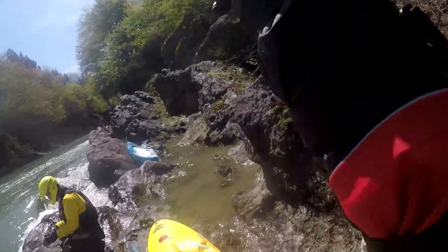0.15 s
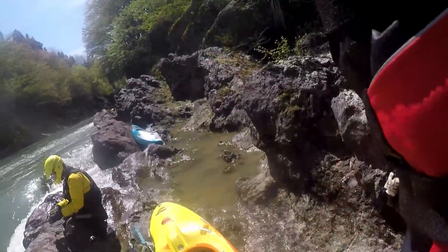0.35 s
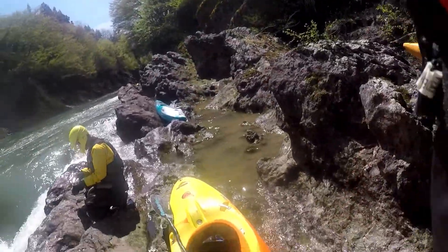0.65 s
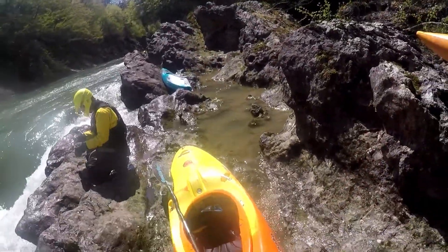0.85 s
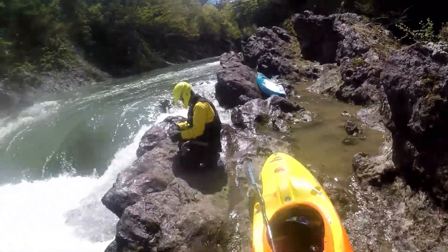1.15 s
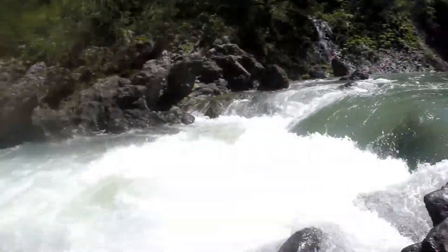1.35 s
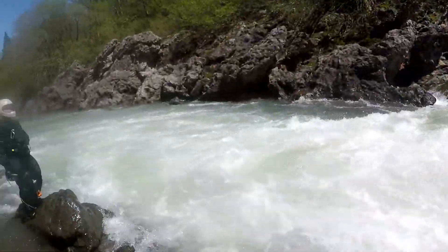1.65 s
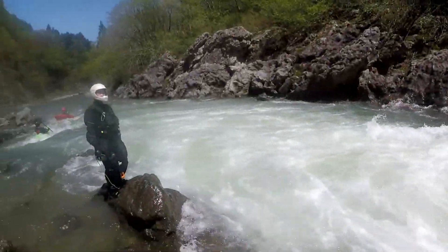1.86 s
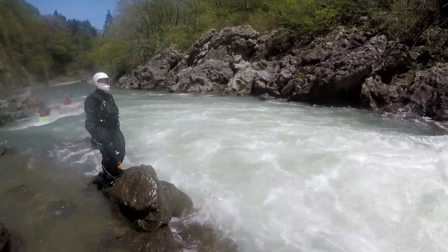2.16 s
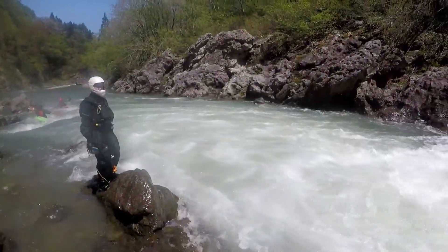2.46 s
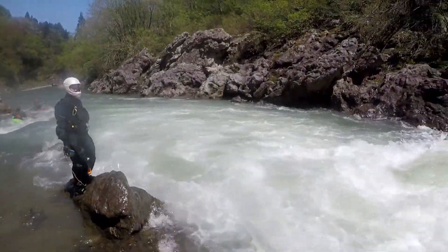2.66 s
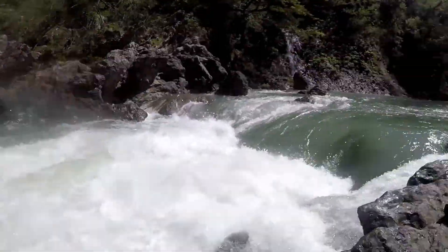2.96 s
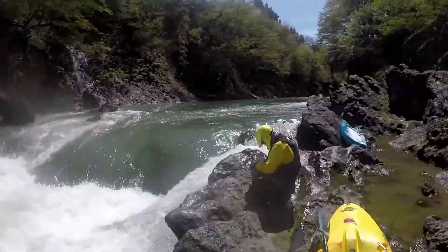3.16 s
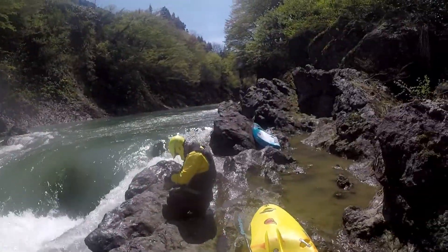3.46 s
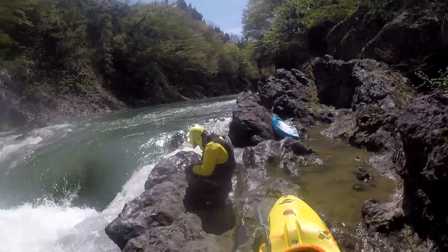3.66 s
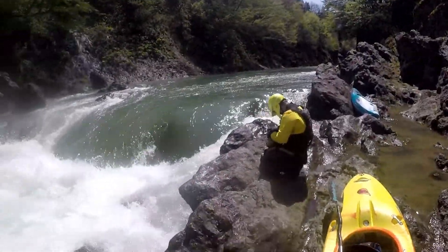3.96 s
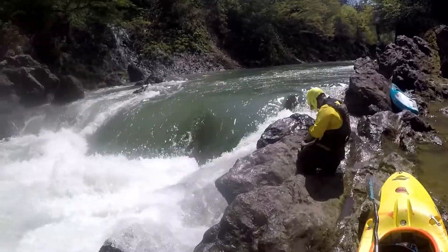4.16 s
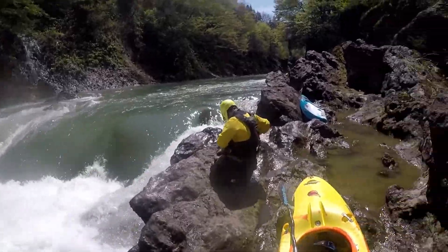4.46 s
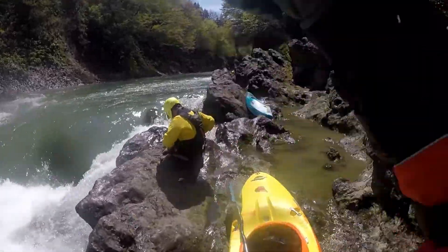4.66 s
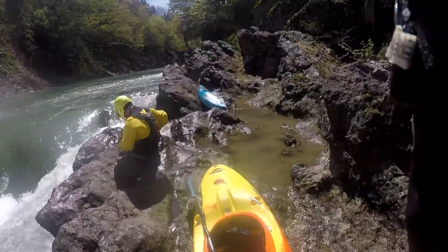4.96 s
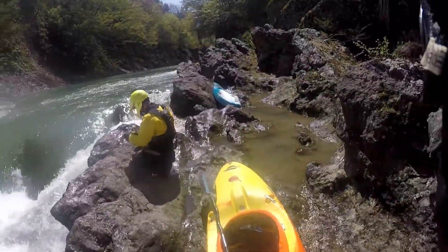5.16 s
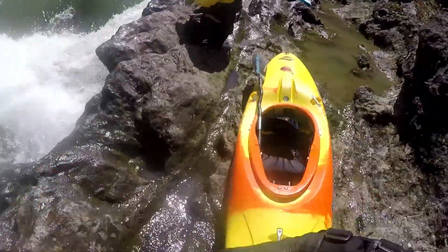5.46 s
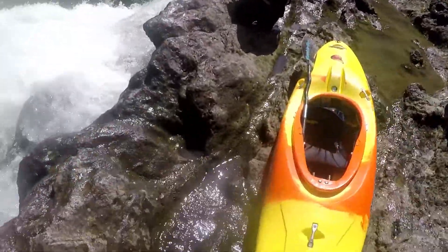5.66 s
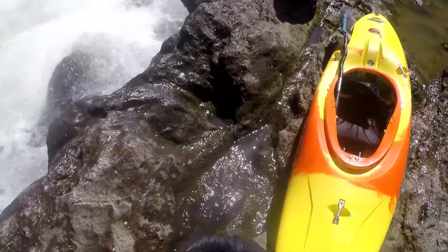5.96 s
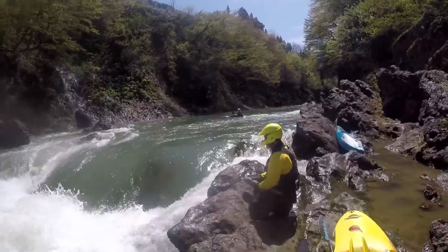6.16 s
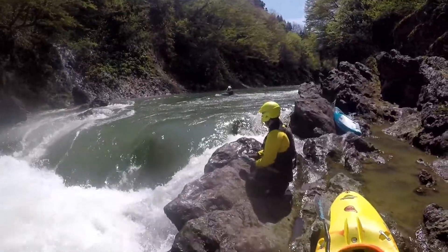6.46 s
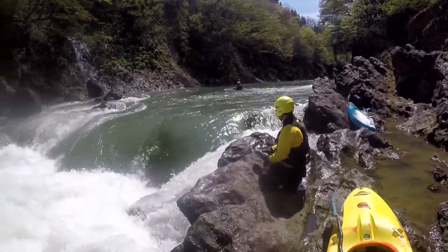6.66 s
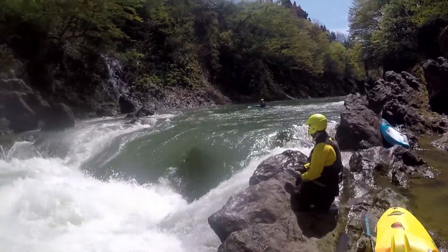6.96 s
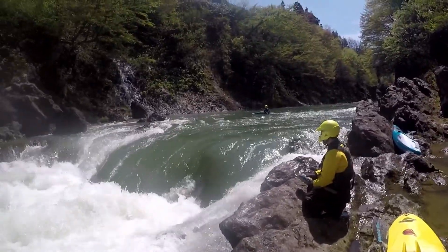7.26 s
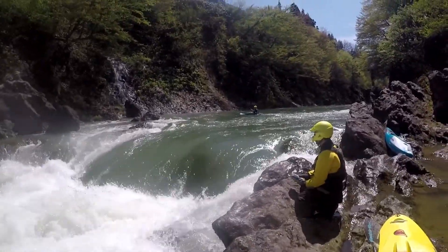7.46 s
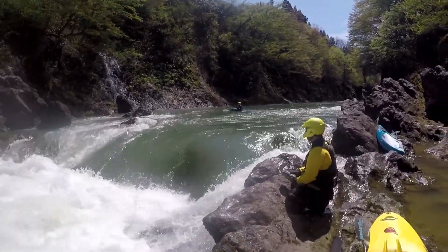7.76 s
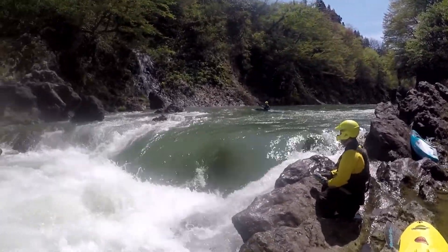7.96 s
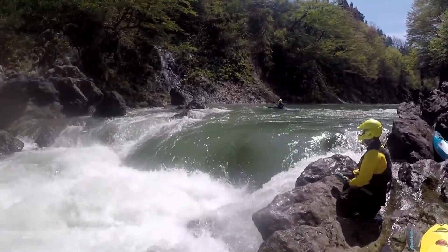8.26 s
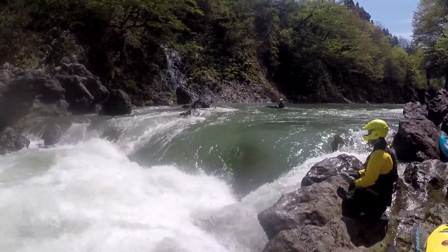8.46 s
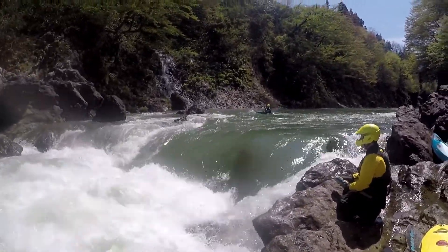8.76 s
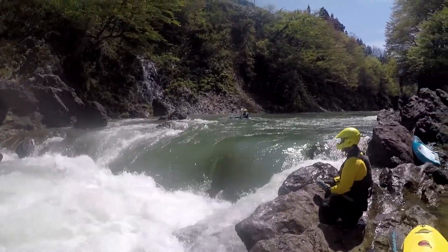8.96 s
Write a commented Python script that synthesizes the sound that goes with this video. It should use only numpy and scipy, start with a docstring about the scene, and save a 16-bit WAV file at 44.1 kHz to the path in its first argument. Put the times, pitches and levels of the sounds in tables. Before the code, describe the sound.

Gusty low rumble and dull jolts hit a body-worn microphone beside rushing rapids. The foaming water hisses and booms throughout, turning brighter or duller as the wearer swings between bank, pool and ledge. About five seconds in comes one sharp plastic knock with brief muffled scuffs of gear. For the last third the wind fades and the water rushes on evenly.

```python
"""A whitewater river rushes over a rock ledge into a foaming hole: foam hisses, bubbles ring, trapped air booms.
It is heard from a body-worn camera in a housing. The wearer turns from the bank to the pool, back to the
ledge and down to the rocks, and the rush changes colour with each turn. Until the wearer stands still,
moving air and jostling rumble on the microphone, and the plastic housing is knocked once."""
import sys
import numpy as np
from scipy import signal
from scipy.fft import rfft, irfft, next_fast_len
from scipy.io import wavfile
from scipy.ndimage import uniform_filter1d, map_coordinates

SR = 44100
rng = np.random.default_rng(int(sys.argv[2]) if len(sys.argv) > 2 else 0)


def file_out(sig):
    """Save sig as 16-bit WAV at sys.argv[1]."""
    # one column per channel
    cols = np.atleast_2d(sig).T
    # limit, then scale
    lim = np.clip(cols, -1, 1)
    pcm = np.round(lim * 32767).astype(np.int16)
    wavfile.write(sys.argv[1], SR, pcm)


N = 401751
TIME = np.arange(N) / SR


def amp(db):
    """Amplitude ratio of a level in decibels."""
    return 10 ** (np.asarray(db) / 20)


def unit(x):
    """Normalisation to rms 1."""
    return x / np.sqrt(np.mean(x ** 2) + 1e-20)


def wobble(per_s):
    """Random modulation: a spline through per_s Gaussian values a second."""
    knots = rng.standard_normal(int(N * per_s / SR) + 4)
    return map_coordinates(knots, [TIME * per_s])


def swells(rows):
    """Superposed Gaussian envelopes, each with a peak time, a length and a level in dB."""
    return sum(amp(db) * np.exp(-(2 * (TIME - s) / length) ** 2) for s, length, db in rows)


def filtered(x, response):
    """Linear filtering: the spectrum of x is multiplied by a frequency response."""
    size = next_fast_len(N + SR // 2)
    return irfft(rfft(x, size) * response(np.fft.rfftfreq(size, 1 / SR)), size)[:N]


def coloured(x, spectrum, modes=()):
    """Source and filter: a spectral envelope with resonances and notches shapes x, returned at rms 1."""
    points_hz, points_db = np.transpose(spectrum)

    def response(hz):
        envelope_db = np.interp(np.log(hz + 1), np.log(points_hz + 1), points_db)
        rolloff_db = 40 * np.log10(np.maximum(hz / points_hz[-1], 1))
        modes_db = sum(db / (1 + (2 * (hz - centre) / width) ** 2) for centre, width, db in modes)
        return amp(envelope_db - rolloff_db + modes_db)
    return unit(filtered(x, response))


def churn(patchy_db):
    """Amplitude modulation band by band: noise swells and fades in patches as foam heaves."""
    bands = signal.stft(rng.standard_normal(N), nperseg=512)[2]
    patches = uniform_filter1d(rng.standard_normal(bands.shape), size=7, axis=0)  # across frequency
    patches = uniform_filter1d(patches, size=14, axis=1)  # across time
    return unit(signal.istft(bands * amp(patchy_db * unit(patches)), nperseg=512)[1][:N])


def bubbles(centre_hz, decay_cycles, count):
    """Bubble resonance: each of a dense crowd is a damped oscillator whose pitch rises slightly."""
    start = rng.integers(0, N, (count, 1))
    hz = np.clip(centre_hz * np.exp(.6 * rng.standard_normal((count, 1))), 500, 9000)
    age = np.arange(SR // 150)  # samples
    cycles = hz * age / SR
    rings = np.exp(-cycles / decay_cycles) * np.sin(2 * np.pi * cycles * (1 + 0.0012 * cycles))
    return unit(np.bincount((start + age).ravel(), rings.ravel())[:N])


# The wearer's moves: an arm draws back, then come the turns. Each row: midpoint in seconds,
# length in seconds, new direction, level of the rush there in dB.
MOVES = [(.65, .2, "bank", -38), (1.2, 0.3, "ledge", -37), (1.37, 0.2, "pool", -35),
         (2.936, .16, "ledge", -37.5), (4.66, 0.34, "rocks", -37), (5.13, 0.3, "bank", -36),
         (5.32, .3, "rocks", -36.5), (6.05, 0.23, "ledge", -37)]


def facing(start_db=-38):
    """Crossfading: each move blends the shares of the directions and the rush's level to new values."""
    shares = {"bank": 1.0, "ledge": 0.0, "pool": 0.0, "rocks": 0.0}
    level_db = start_db
    for s, length, towards, db in MOVES:
        progress = np.clip((TIME - s) / length + .5, 0, 1)
        turned = np.sin(np.pi / 2 * progress) ** 2
        shares = {name: share * (1 - turned) + turned * (name == towards)
                  for name, share in shares.items()}
        level_db = level_db * (1 - turned) + turned * db
    return shares, level_db


# Spectra of the rush from each direction. Each row: frequency in Hz, relative spectral density in dB.
BANK_SPECTRUM = [(200, -16), (500, -11), (850, -12.5), (1300, -8), (2000, -1), (3000, -7.5), (4300, -9),
                 (5800, -16.5), (7100, -24), (8800, -22), (10500, -27.5), (13000, -38), (15200, -45.0)]
LEDGE_SPECTRUM = [(200, -30), (500, -6.5), (850, -6.5), (1300, -5.5), (2000, 0.0), (3000, -1.5),
                  (4300, -2.5), (5800, -14), (7100, -16.5), (8800, -15), (10500, -21), (13000, -30.5),
                  (15200, -37)]
POOL_SPECTRUM = [(200, -32), (500, -12), (850, -11.5), (1300, -7.5), (2000, -1), (3000, -10), (4300, -8.5),
                 (5800, -14.5), (7100, -22.5), (8800, -24), (10500, -27.5), (13000, -39.0), (15200, -47)]
ROCK_SPECTRUM = [(200, -30), (500, -4.5), (850, -7.5), (1300, -2.5), (2000, -2), (3000, -2), (4300, -3.5),
                 (5800, -10), (7100, -18), (8800, -18), (10500, -25), (13000, -32), (15200, -40)]
# Resonances and notches of housing and surroundings. Each row: centre in Hz, width in Hz, gain in dB.
BANK_RESONANCES = [(975, 59, 4), (1340, 192, 6), (2660, 378, -4), (4377, 398, 0.5), (4952, 173, -10),
                   (5634, 180, 1)]
LEDGE_RESONANCES = [(1007, 32, 7.5), (1200, 96, 4.8), (1406, 165, 10), (1686, 125, 9), (1872, 142, 8.5),
                    (3300, 650, 5), (3526, 190, -5.5), (3810, 230, 4.5), (4900, 394, -3), (5520, 690, 8),
                    (6400, 220, 7)]
POOL_RESONANCES = [(1250, 190, 4), (1490, 71, -5.5), (2244, 310, 6.5), (2940, 270, 7.5), (3660, 165, -4),
                   (4000, 130, 2.5), (4360, 180, 4)]
ROCK_RESONANCES = [(1450, 230, 5), (1850, 70, 8), (2170, 71, 2), (2810, 115, 5), (3790, 130, 5),
                   (4952, 356, -5.5), (5557, 196, 2.5)]
# Sound from off axis. Each entry: direction, weight it keeps when the wearer faces away.
OFF_AXIS_WEIGHT = {"bank": .01, "ledge": 0.046, "pool": 0.023, "rocks": 0.072}


def rush(bubble_db=-11, surge_db=0.36, flicker_db=0.26):
    """Directional filtering: foam and bursting bubbles take their colour from the way the camera faces."""
    foam = churn(patchy_db=0.46) + amp(bubble_db) * bubbles(centre_hz=2573, decay_cycles=2.3, count=12000)
    colours = {"bank": (BANK_SPECTRUM, BANK_RESONANCES), "ledge": (LEDGE_SPECTRUM, LEDGE_RESONANCES),
               "pool": (POOL_SPECTRUM, POOL_RESONANCES), "rocks": (ROCK_SPECTRUM, ROCK_RESONANCES)}
    shares, level_db = facing()
    weights = {name: share + OFF_AXIS_WEIGHT[name] for name, share in shares.items()}
    heard = sum(weights[name] * coloured(foam, *colour) for name, colour in colours.items())
    heard /= sum(weights.values())
    return heard * amp(level_db + surge_db * wobble(9) + flicker_db * wobble(35))


# Boom of the plunging water, heard from the front and when turned to the pool.
# Each row: frequency in Hz, relative spectral density in dB.
BOOM_FRONT = [(30, -36), (95, -43), (120, -23), (150, 2.5), (200, -2), (255, 1.5), (320, -5.5),
              (410, -11.5), (500, -19), (900, -61)]
BOOM_BEHIND = [(30, -24), (100, -25), (150, -2), (230, -6), (325, -1), (380, -8), (460, -16), (900, -47)]


def plunge(front_db=-41.0, behind_db=-42.0, heave_db=0.3):
    """Collective oscillation: clouds of trapped air boom under the ledge, thinner towards the pool."""
    shares, _ = facing()
    away = np.clip(shares["pool"], 0, 1)
    front = amp(front_db) * coloured(churn(patchy_db=0.6), BOOM_FRONT)
    behind = amp(behind_db) * coloured(churn(patchy_db=0.8), BOOM_BEHIND)
    return (np.sqrt(1 - away) * front + np.sqrt(away) * behind) * amp(heave_db * wobble(8.6))


def even_noise(spectrum, span_s):
    """Envelope normalisation: coloured noise is divided by its running rms to hold its strength even."""
    noise = coloured(rng.standard_normal(N), spectrum)
    power = np.abs(uniform_filter1d(noise ** 2, int(span_s * SR)))
    return noise / np.sqrt(power + 1e-3)


# Pressure of large slow eddies and small quick ones.
# Each row: frequency in Hz, relative spectral density in dB.
SLOW_EDDIES = [(6, -22), (14, 3), (26, -2.5), (46, 0.5), (62, -11), (85, -19), (150, -44)]
QUICK_EDDIES = [(40, -24), (65, 0.5), (100, 1), (128, -1), (165, -16.5), (300, -24.5), (600, -51),
                (1500, -64)]
# Air flow, dying away once the wearer stands still. Each row: time in seconds, level in dB.
FLOW_LEVELS = [(0, -25.5), (.6, -28.5), (1.75, -22), (2.25, -31.5), (2.8, -26), (3.4, -35), (4.15, -40.5),
               (4.65, -32), (5.0, -32), (5.4, -26.5), (6.02, -33), (6.05, -48.5), (7.45, -52), (8.3, -66),
               (9.11, -71)]
# Puffs as the wearer swings round. Each row: peak time in seconds, length in seconds, level in dB.
SWING_PUFFS = [(.72, 0.14, -32), (1.25, 0.15, -30.5), (1.5, 0.34, -31), (2.73, 0.19, -34),
               (3.06, 0.15, -27), (5.22, 0.2, -31), (5.55, 0.18, -35.5), (5.91, 0.13, -34.5)]


def wind_rumble(gust_db=1.5, gusts_per_s=8, quick_db=-12.5, quick_growth=0.82, flutter_db=1.3):
    """Turbulence: one gusty flow buffets the microphone with slow and quick eddies; swings add puffs."""
    flow_db = np.interp(TIME, *np.transpose(FLOW_LEVELS))
    mean_db = flow_db.mean()
    excess_db = flow_db - mean_db + gust_db * wobble(gusts_per_s)
    slow_gain = amp(mean_db + excess_db)
    quick_gain = amp(mean_db + quick_db + quick_growth * excess_db + flutter_db * wobble(gusts_per_s))
    quick_gain = np.hypot(quick_gain, swells(SWING_PUFFS))  # powers add
    slow = slow_gain * even_noise(SLOW_EDDIES, span_s=0.14)
    quick = quick_gain * even_noise(QUICK_EDDIES, span_s=0.14)
    return slow + quick


# Narrow parts of the rush that ring out in passing. Each row: peak time in seconds,
# length in seconds, centre in Hz, nominal width in Hz, level in dB.
PASSING_BANDS = [(.83, 0.63, 2940, 380, -43), (1.772, 0.33, 3940, 130, -48), (4.95, 0.071, 2090, 180, -38),
                 (5.72, 0.32, 2770, 130, -47)]


def flares():
    """Band-pass resonance: a band of the rush swells and fades as the camera swings past rock and body."""
    out = np.zeros(N)
    for s, length, centre, width, db in PASSING_BANDS:
        band = filtered(rng.standard_normal(N), lambda hz: 1 / (1 + ((hz - centre) / (.75 * width)) ** 2))
        out += swells([(s, length, db)]) * unit(band)
    return out


# Jolts to the housing. Each row: midpoint in seconds, envelope peak in dB, frequency in Hz.
HOUSING_JOLTS = [(0.684, -13, 47.6), (1.179, -15.5, 62), (1.647, -18, 34.8), (2.168, -16, 34.6),
                 (2.43, -20, 28.5), (2.624, -14.5, 43.6), (2.71, -13, 27), (3.731, -20.5, 42),
                 (4.569, -19, 34), (4.78, -16.5, 68.4), (5.152, -9.5, 82), (5.478, -8.5, 24)]


def jolts(half_width_cycles=0.52):
    """Forced motion: each jolt gives the housing one soft push and pull, without ringing."""
    out = np.zeros(N)
    for s, db, hz in HOUSING_JOLTS:
        cycles = hz * (TIME - s)
        out -= amp(db) * np.sin(2 * np.pi * cycles) * np.exp(-(cycles / half_width_cycles) ** 2)
    return out


# Gear shifting against the mount. Each row: peak time in seconds, length in seconds, level in dB.
GEAR_RUBS = [(3.08, 0.088, -35.5), (5.233, 0.062, -27.5), (5.326, 0.1, -28.5), (5.676, 0.18, -35.5)]
# Spectrum of the rubbed mount. Each row: frequency in Hz, relative spectral density in dB.
MOUNT_SPECTRUM = [(50, -31), (105, 7.5), (160, 1.5), (240, -2.5), (340, -12.5), (480, -46), (1200, -26)]


def scuffs():
    """Friction noise: gear rubs on the camera mount in short dull swells."""
    return swells(GEAR_RUBS) * even_noise(MOUNT_SPECTRUM, span_s=0.076)


# The plastic contacts of one knock. Each row: start in seconds, gain in dB.
KNOCK_CONTACTS = [(5.1395, -28), (5.143, -29), (5.1468, -13.5)]
# Modes of the housing. Each row: frequency in Hz, relative level in dB, time to fall 60 dB in seconds.
HOUSING_MODES = [(346, 3.5, 0.012), (1066, -15.5, 0.072), (1455, -9, 0.075), (1544, -4.5, 0.028),
                 (2340, -11, .009)]


def knock(crack_db=-8, crack_t60=0.0047, snap_db=-1, snap_t60=0.006, lowpass_hz=3900):
    """Impact excitation: three quick contacts snap against the housing and ring its damped modes."""
    out, t = np.zeros(N), np.arange(SR // 10) / SR
    for s, db in KNOCK_CONTACTS:
        ring = sum(amp(mode_db + rng.normal(0, 1) - 60 * t / t60) * np.sin(2 * np.pi * hz * t)
                   for hz, mode_db, t60 in HOUSING_MODES)
        crack = amp(crack_db - 60 * t / crack_t60) * rng.standard_normal(len(t))
        snap = amp(snap_db - 60 * t / snap_t60)  # one-sided pressure pulse
        out[round(s * SR):][:len(t)] -= amp(db) * (ring + crack + snap)
    return filtered(out, lambda hz: 1 / (1 + (hz / lowpass_hz) ** 4))


def scene():
    """Superposition: the river and the noises made on the camera itself add in one channel."""
    return (rush() + plunge() + wind_rumble() + flares() + jolts() + scuffs() + knock())[None]


def record(dry):
    """Band limiting: the camera passes nothing above 15.3 kHz."""
    return np.array([filtered(channel, lambda hz: hz < 15300) for channel in dry])


dry = scene()
out = record(dry)
file_out(out)
```